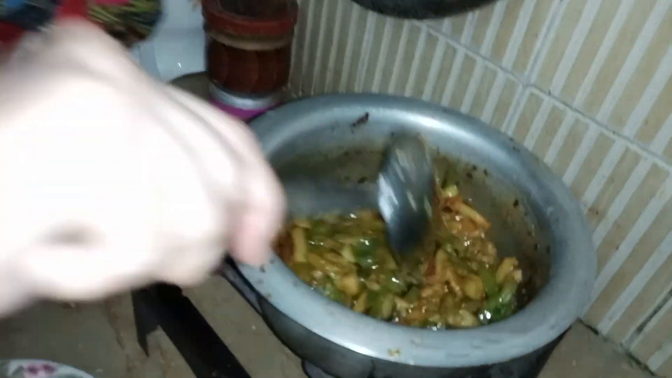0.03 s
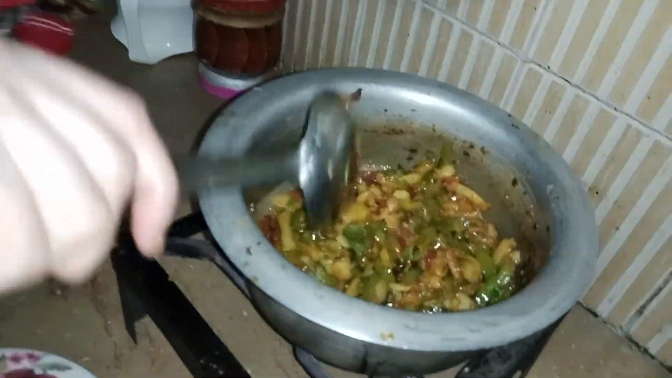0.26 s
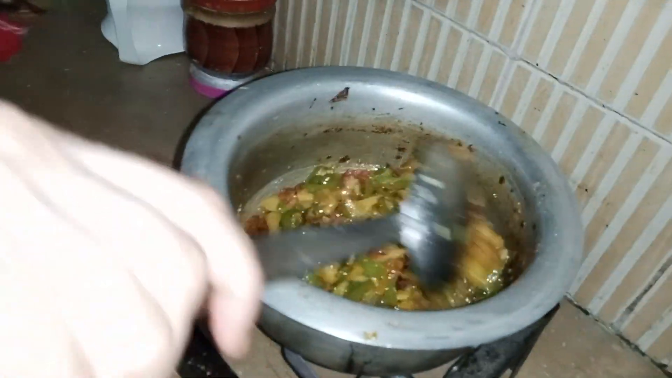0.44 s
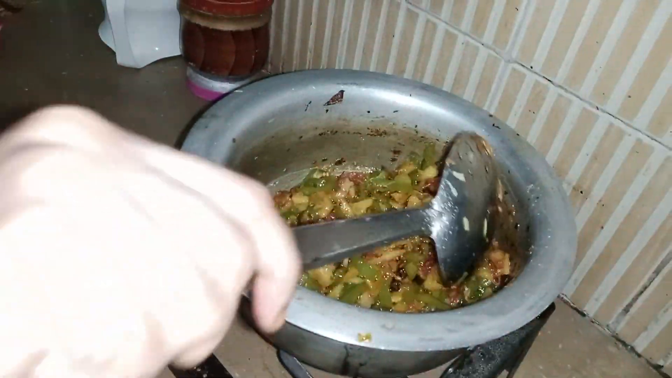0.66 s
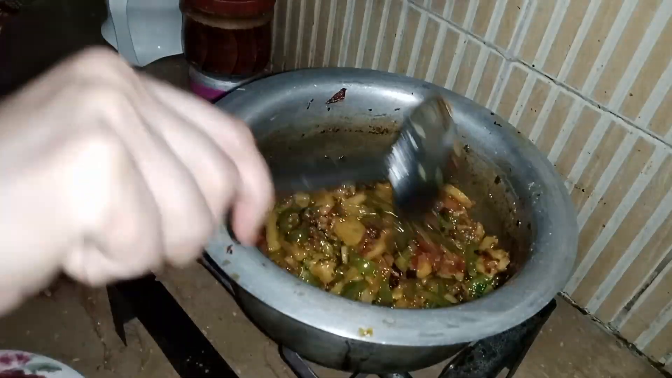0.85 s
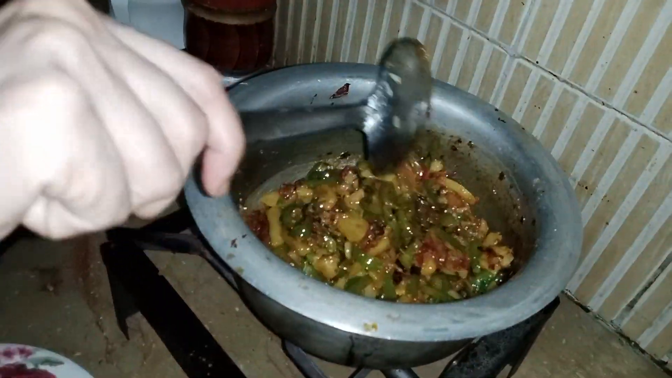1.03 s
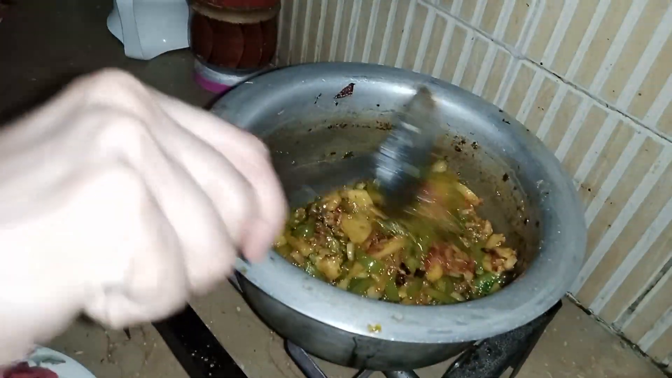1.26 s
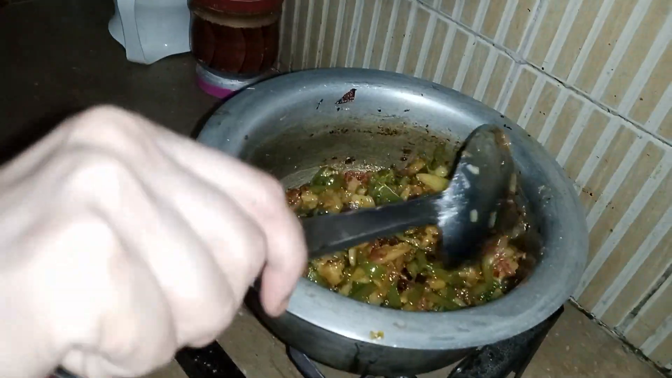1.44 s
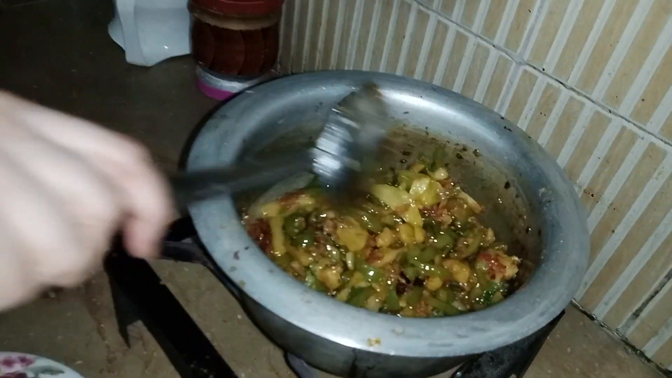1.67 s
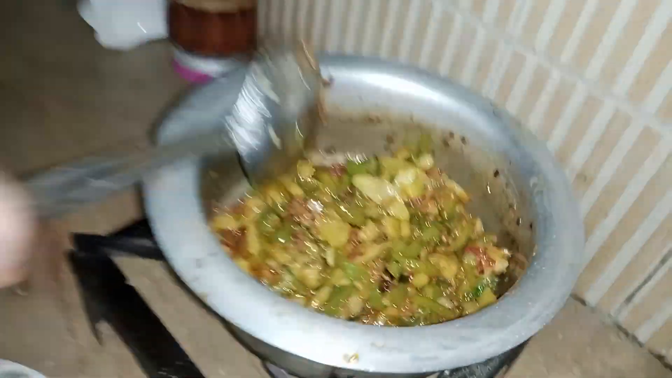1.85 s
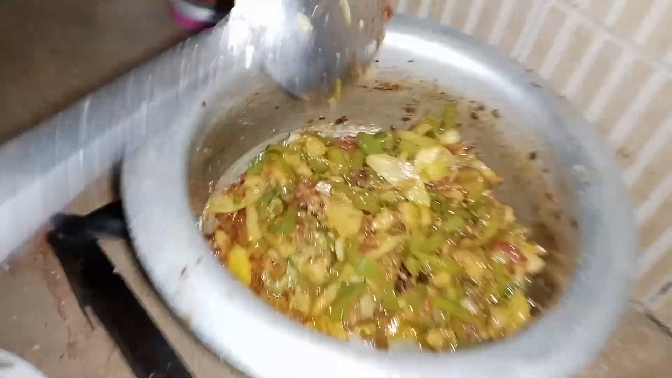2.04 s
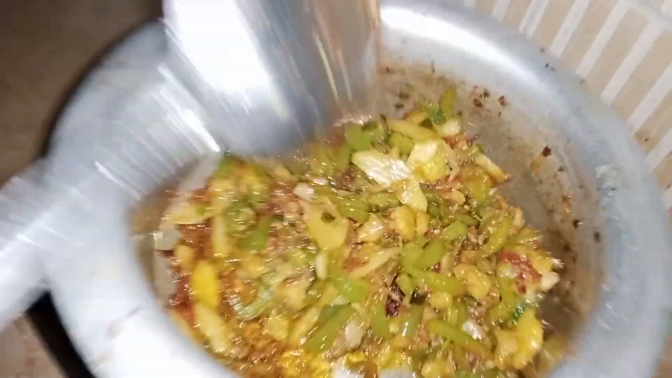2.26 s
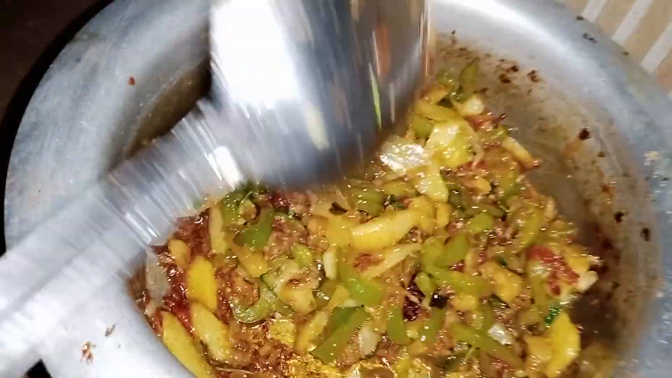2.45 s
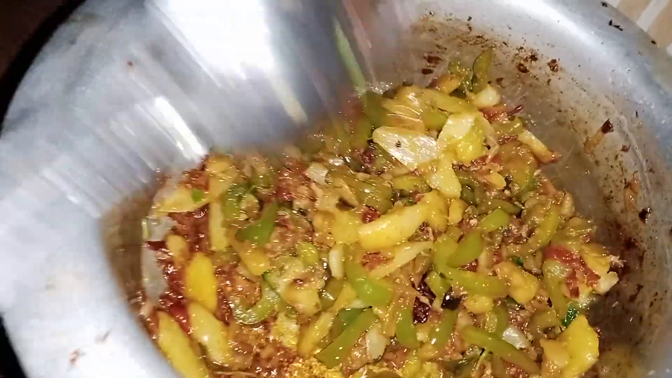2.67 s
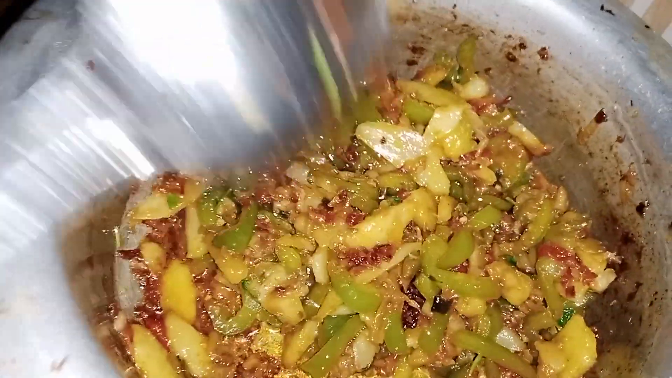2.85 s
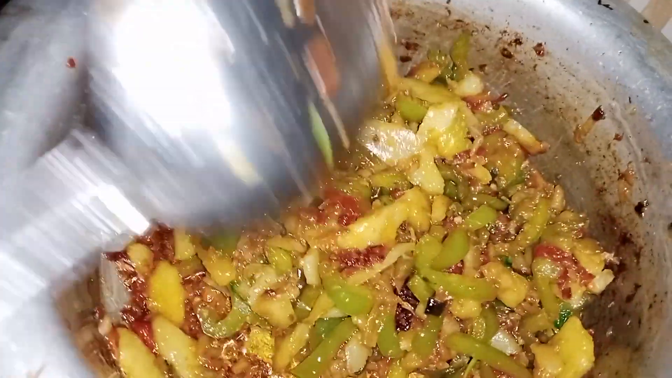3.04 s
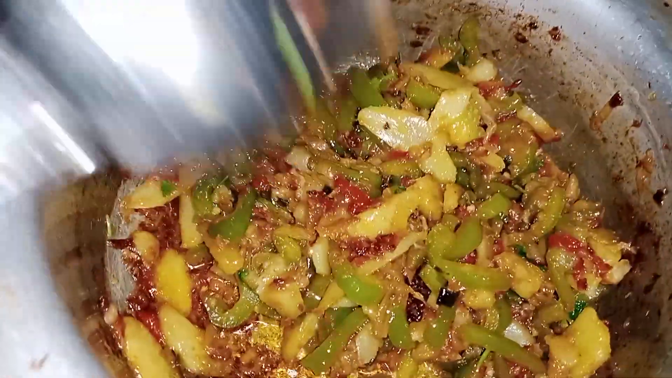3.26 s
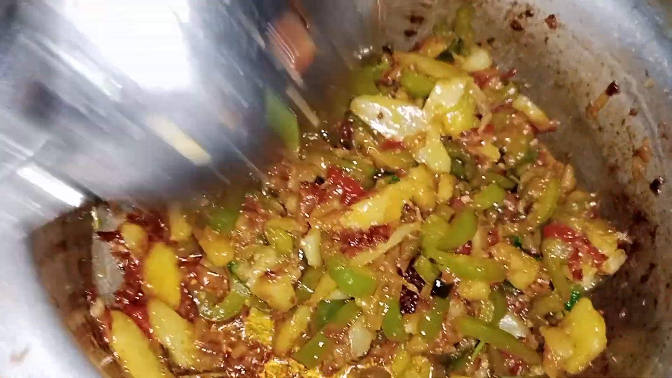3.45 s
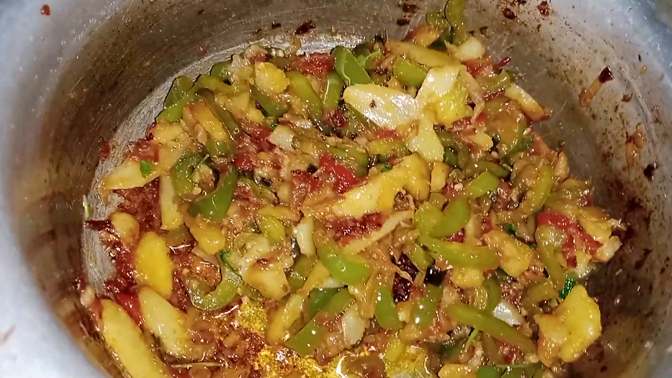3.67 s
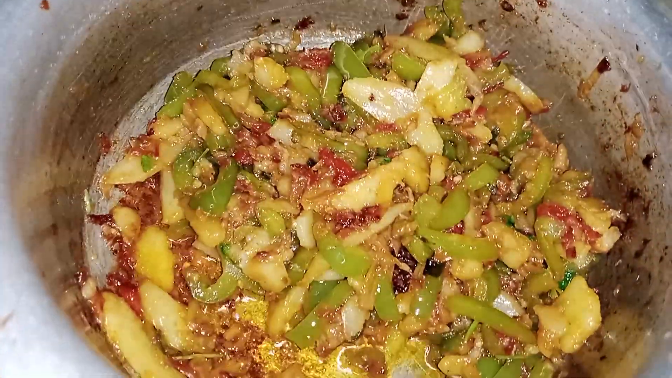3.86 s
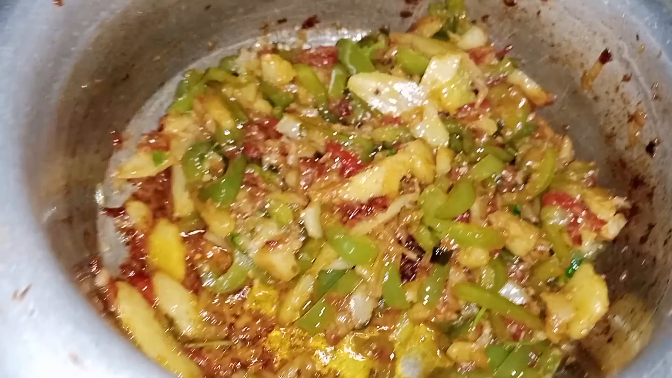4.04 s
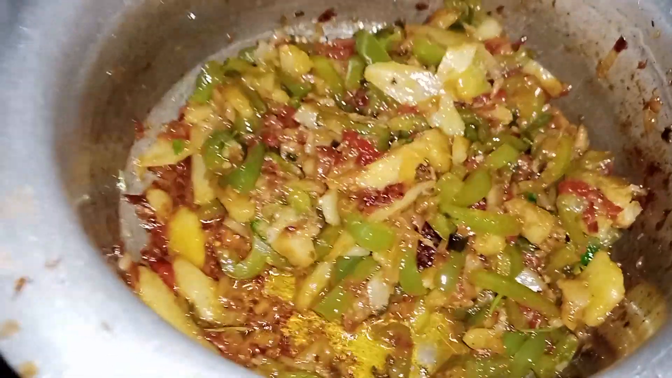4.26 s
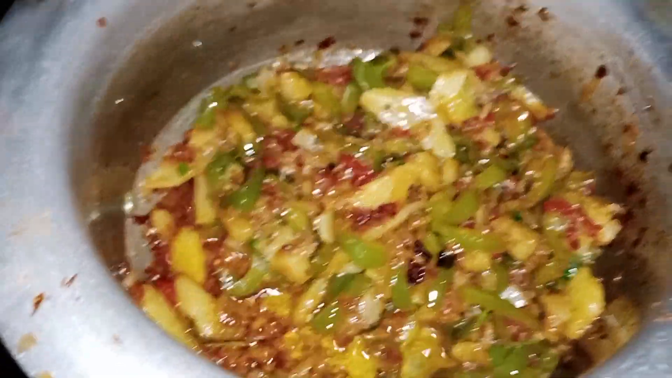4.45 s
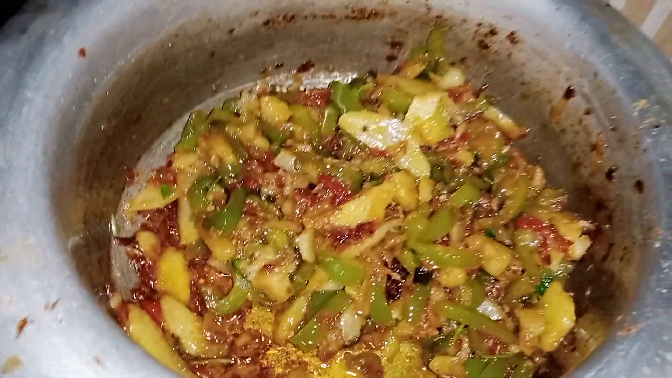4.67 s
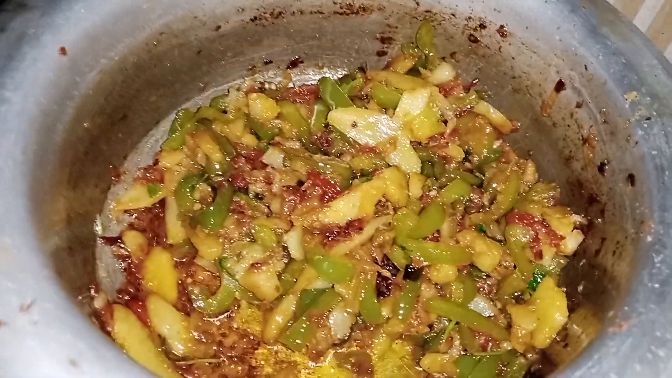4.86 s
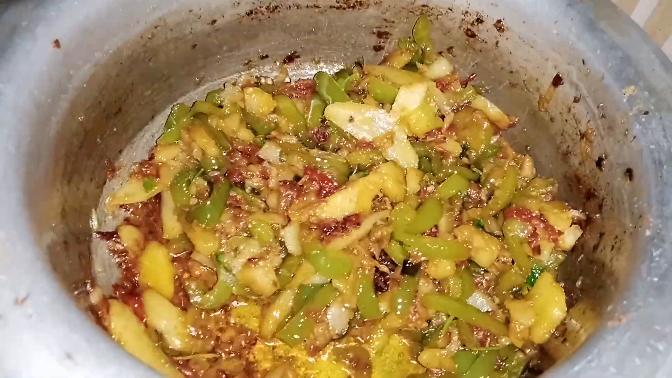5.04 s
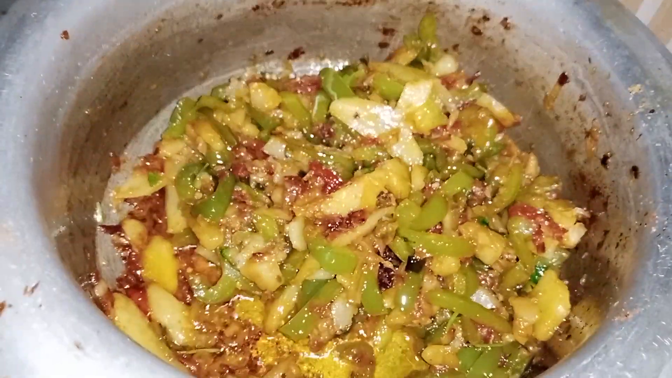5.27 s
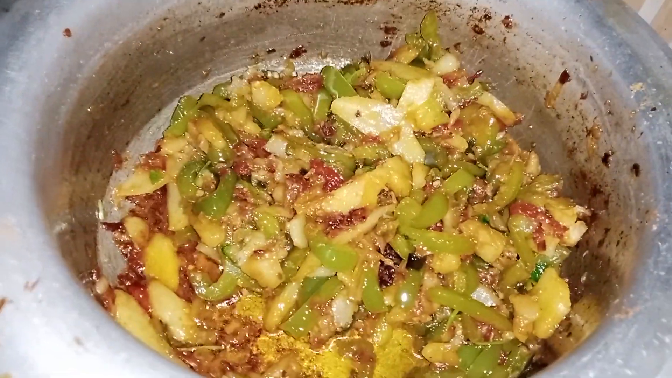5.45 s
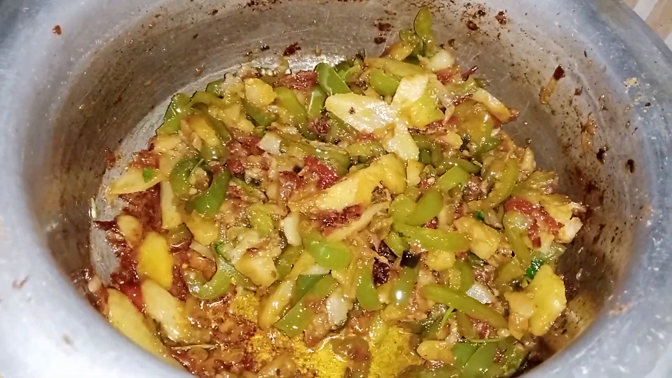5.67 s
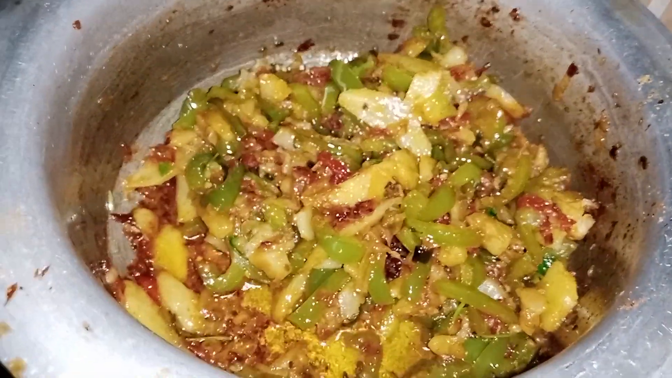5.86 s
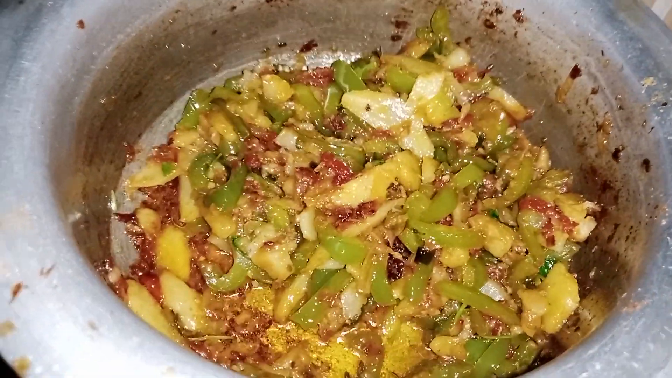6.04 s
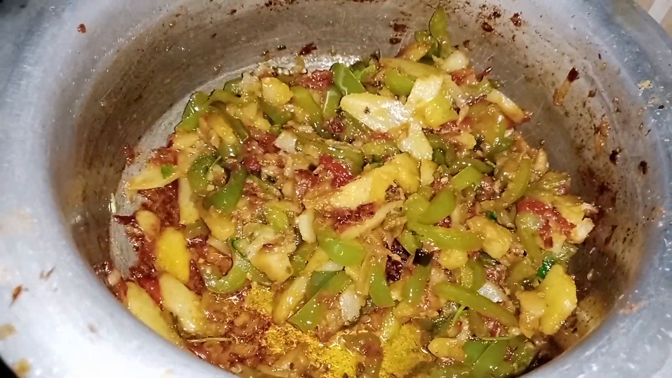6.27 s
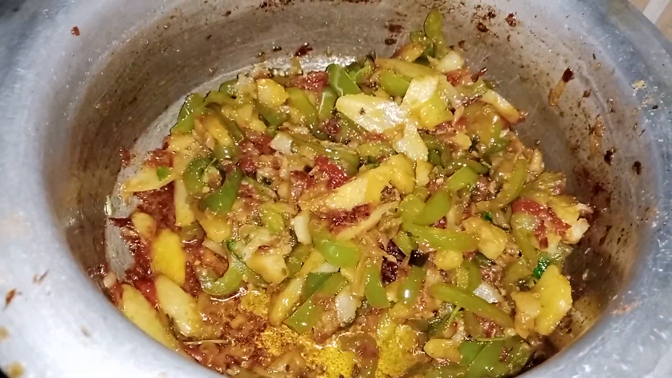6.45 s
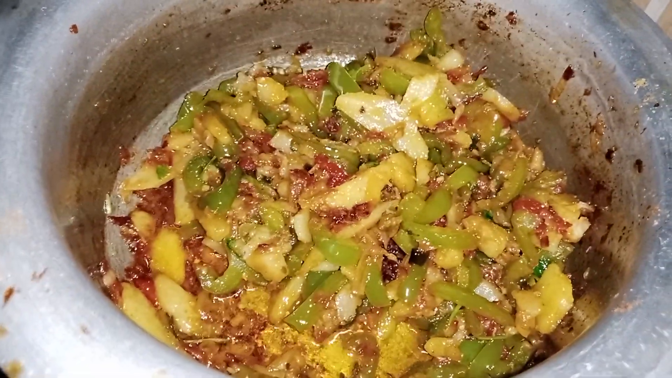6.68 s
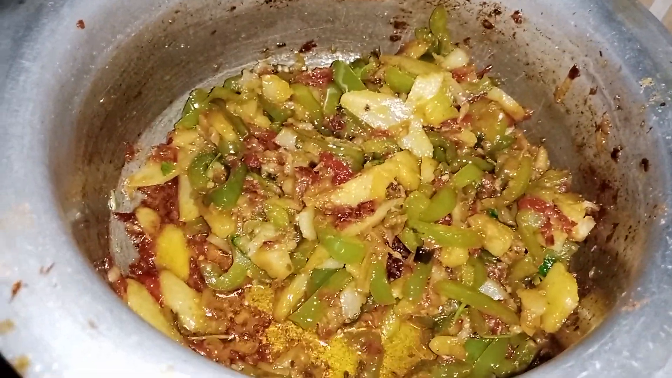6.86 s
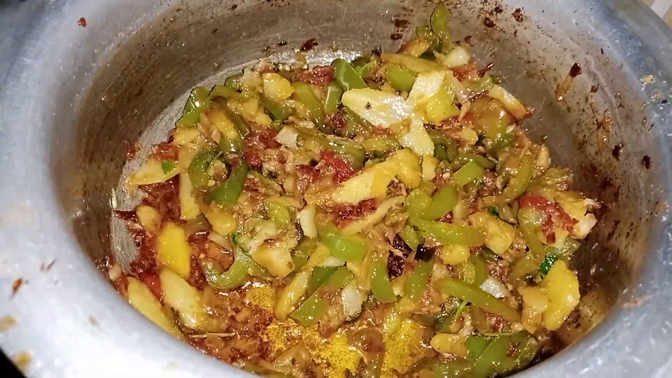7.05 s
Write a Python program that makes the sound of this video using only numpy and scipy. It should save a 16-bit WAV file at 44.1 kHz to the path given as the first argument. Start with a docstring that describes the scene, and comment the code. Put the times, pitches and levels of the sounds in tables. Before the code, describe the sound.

A quiet, fine-grained sizzle of vegetables in oil runs throughout, with bright little spits and a faint gas burner rush, heard close up on a phone in a reverberant tiled kitchen. From 0 to about 1 second a ladle makes soft, wet, hollow strokes through the food; at 1.2 a muffled double knock sounds inside the pot, and another faint stroke follows from 1.75. Between 2.25 and 3.5 seconds the ladle raps the rim seven times, about five per second: loud, hard metallic clacks with short ringing and a quick rattle as the pot drops back. The sizzle ducks under them, then swells back as the echo fades by about 4. A sharp spit comes at 4.3, then a dull, thudding clatter on the counter at 4.4-4.6 with low handling bumps. Gentle frying and a wavering, faint hollow note continue, with a tiny soft rustle at 6.3, until 7.

```python
"""Vegetables sizzle in a pot on a gas burner: bands of resonant bubble clicks, hiss and single spits of fat.
A ladle strokes the food (noise through the pot's air modes) and knocks softly inside the pot.
Then it raps the rim seven times: noise clacks and decaying modes, with a rattle as the pot drops back.
A tiled kitchen reverberates; the phone's limiter ducks on the raps and lets the sound swell back.
Last the ladle clatters down on the counter, and a soft rustle of shaped noise swells and dies away."""
import sys
import numpy as np
from scipy import signal
from scipy.fft import rfft, irfft, next_fast_len
from scipy.io import wavfile
from scipy.ndimage import uniform_filter1d, minimum_filter1d

SR = 44100
rng = np.random.default_rng(int(sys.argv[2]) if len(sys.argv) > 2 else 0)


def store_pcm(level_fs):
    """Save levels as 16-bit WAV."""
    pcm = np.round(np.clip(level_fs, -1, 1) * 32767).astype(np.int16)
    wavfile.write(sys.argv[1], SR, np.atleast_2d(pcm).T)


N = 313551
TIME = np.arange(N) / SR  # seconds

# Raps of the ladle on the rim. Each row: start in seconds, level in dB, pitch of the ladle's ring in Hz,
# ring in dB, body in dB, pitch of the pot's ring in Hz, time until the pot drops back in seconds,
# level of its rattle in dB.
RAPS = [(2.2583, -2, 5800, 1, 0, 1530, .038, -13), (2.48, -3, 4400, 4.5, -1.5, 2500, .043, -10),
        (2.6772, -9.5, 4100, 1, 6.5, 2400, 0.03, -8.5), (2.8823, -4.5, 6500, -0.5, 6.5, 2480, 0.044, -9),
        (3.0906, -2.5, 7200, 2, 3, 2030, .046, -10.5), (3.288, -3, 7500, 3, 2.5, 2000, .047, -9.5),
        (3.4985, -1, 7400, -3.5, 0, 1910, 0.046, -13)]
# Vibration modes of the pot. Each row: frequency in Hz, level in dB, T60 in seconds.
POT = [(450, -3, 0.42), (542, -4, 0.5), (600, -1, 0.6), (682, -5, 0.5), (719, -2, 0.72), (762, -4, 0.5),
       (1343, -4, 0.5), (1553, -1, 0.55), (1797, -9, 0.6), (2039, -1, 0.76), (2227, 2, 0.4),
       (2378, 0, 0.65), (2636, -1, 0.44), (2745, -5, 0.47), (3448, -1, 0.42), (3585, -7, 0.55),
       (3920, -1, 0.41), (4111, -1, 0.54), (4370, -5, 0.5), (4620, -3, 0.5), (4802, -4, 0.5),
       (5410, -1, 0.5), (5655, 4, 0.5), (6019, -3, 0.5), (6442, -3, 0.5), (6714, -4, 0.5), (6961, -4, 0.5),
       (7280, -6, 0.5), (7647, -7, 0.5), (9040, -6, 0.5)]


def rapping():
    """Impact and modal decay: a noisy contact excites ladle, pot and stove; the pot then rattles."""
    # Modes of the stand and stove. Each row: frequency in Hz, level in dB, T60 in seconds.
    stove_modes = [(87.1, 1.5, 0.41), (100, -6, 0.5), (125.5, -19.5, .3), (322, -6, 0.2)]
    # Colour of metal on metal. Each row: frequency in Hz, gain in dB.
    clack_colour = [(60, -27), (130, -4.5), (260, -8.5), (460, 1.5), (700, 3.5), (1000, -8.5), (1350, -4.5),
                    (2700, -6), (3150, -7), (4100, -1.5), (7000, -3.5), (9000, -2.5), (13300, -17.5),
                    (15300, -14)]
    # The ladle's own short ring. Each row: frequency in Hz, level in dB, T60 in seconds.
    ladle_modes = [(3950, -2, .08), (4280, -3, .07), (4620, 0, .08), (4830, -1, .08), (5440, -5, .08),
                   (6130, -4, .08), (6480, -3, .08), (6730, 0, .1), (6970, 1, .1), (7130, 0, .1),
                   (7290, -3, .1), (7630, -4, .09), (8300, -7, .07), (8520, -6, .07), (9030, -2, .1),
                   (10700, -11, .05)]
    rattle_colour = [(200, -2), (550, 2.5), (1500, 4.5), (2700, 7.5), (5000, -6.0), (9000, -11.5)]

    clacks, ringing = np.zeros(N), np.zeros(N)
    stove = rings(stove_modes)
    bite = 1 - np.exp(-TIME[:SR] / .0008)  # the contact force takes a moment to build
    for s, db, ring_hz, ring_db, body_db, pot_hz, *_ in RAPS:
        spot = [(900, body_db), (ring_hz * 0.66, -1), (ring_hz, ring_db + 7.0), (ring_hz * 1.37, -body_db)]
        contact = bite * (burst(0.04) + amp(0.5) * burst(0.013))
        clack = colour(colour(contact, spot), clack_colour)
        ladle = strike(favour(ladle_modes, ring_hz, ring_db=6), scatter_db=1)
        pot = strike(favour(POT, pot_hz, ring_db=5), scatter_db=1)
        add(clacks, s, amp(db) * (clack + amp(ring_db - 22) * ladle))
        add(ringing, s, amp(db - 32) * pot)
        add(ringing, s, amp(db - 37.5) * strike(stove, scatter_db=0.5))

    pot_hz = np.array(POT)[:, :1]
    duller = rings(POT) / np.hypot(1, pot_hz / 4500)  # softer landings excite less treble
    for s, db in rocking(count=3):
        clack = colour(colour(bite * burst(t60=0.046), rattle_colour), clack_colour)
        pot = strike(duller, scatter_db=-0.5)
        add(clacks, s, amp(db) * clack)
        add(ringing, s, amp(db - 36.0) * pot + amp(db - 28.0) * strike(stove, scatter_db=0))
    return clacks + ringing + amp(-5.5) * kitchen(clacks, build_s=0.0056)


def favour(modes, ring_hz, ring_db):
    """Selective excitation: the spot that lands drives the modes around one pitch hardest."""
    hz = np.array(modes)[:, :1]
    octaves = np.log2(hz / ring_hz)
    return amp(ring_db * np.exp(-(octaves / 0.47) ** 2)) * rings(modes)


def rocking(count):
    """Energy loss in rebound: the pot lands in ever shorter, softer hops; rows of (s, dB)."""
    hop_share, hop_loss_db = .55, 1.72  # length relative to the hop before; drop in level per hop
    hops = np.arange(count)
    landings = np.cumsum(hop_share ** hops)
    return [(s + drop_s * landings[k], db - hop_loss_db * k) for s, *_, drop_s, db in RAPS for k in hops]


def knocking():
    """Damped impact: cushioned by food, the ladle wakes mainly the pot's lower modes."""
    # Soft knocks inside the pot. Each row: start in seconds, level in dB.
    knocks = [(1.2217, 0.5), (1.228, -2)]
    # How a blow on the inner wall shares its force. Each row: mode frequency in Hz, gain in dB.
    wall = [(450, -26), (600, -10.5), (720, 0.5), (780, -25), (1340, -20), (1550, -2.5), (1800, 9),
            (2040, 1.5), (2400, -14), (2750, -8), (3400, -4), (9000, -26)]
    clunk_colour = [(300, -46), (660, 7), (950, -44), (1700, -10), (2200, -20), (2700, 7),
                    (3100, -17), (9000, -21)]
    out = np.zeros(N)
    share = amp(np.interp(np.array(POT)[:, :1], *np.transpose(wall)))
    for s, db in knocks:
        clunk = colour(burst(0.076), clunk_colour)
        pot = strike(share * rings(POT), scatter_db=-4)
        add(out, s, amp(db - 56.0) * pot + amp(db - 30.0) * clunk)
    return out


def setting_down():
    """Heavily damped impact: each contact of ladle and counter is a dull clatter with a low thud."""
    # Contacts with the counter. Each row: start in seconds, relative level in dB, T60 in seconds,
    # relative thud in dB.
    contacts = [(4.415, -40, 0.16, -1), (4.445, -41.5, 0.12, 4.5), (4.495, -49, 0.22, -5),
                (4.552, -47.5, 0.11, -2.5), (4.563, -43.5, 0.14, -12), (4.574, -43.5, 0.1, -4)]
    # Colour of the clatter. Each row: frequency in Hz, gain in dB.
    counter_colour = [(100, -28), (300, -8), (550, -10.5), (800, -5.5), (1300, -1.5), (1900, -2),
                      (2900, -2.5), (4500, -5), (8000, -6.5), (15000, -27)]
    slab = rings([(84.0, -13, 0.3), (109.6, 5.0, 0.16), (137, -1, 0.14), (208, -5.0, 0.28),
                  (271.6, -2.0, 0.23), (551, -3.0, 0.13), (1486, -1.5, 0.063), (2790, 2.0, 0.081)])
    out = np.zeros(N)
    for s, db, t60, thud_db in contacts:
        clatter = colour(burst(t60), counter_colour)
        thud = amp(thud_db - 16.0) * strike(slab, scatter_db=0.0)
        add(out, s, amp(db + 8.5) * (clatter + thud))
    return out


def spitting():
    """Explosive boiling: a water drop bursts in the fat as a snap around one pitch and a brief fizz."""
    # The loudest spits. Each row: start in seconds, level before colouring in dB, pitch in Hz, fizz in dB.
    loud_spits = [(0.0102, -30, 6250, -6), (0.5732, -29.5, 6160, -8), (0.849, -29, 6260, -4),
                  (1.3124, -36, 5400, -7), (1.8562, -32, 4330, -5), (4.3268, -24.5, 4710, -7),
                  (5.6042, -34, 6730, -6.5), (5.7152, -34, 6100, -3), (6.2312, -32, 5690, -7),
                  (6.6538, -28, 6140, -7.5), (6.9376, -31.5, 2940, -5)]
    spit_colour = [(400, -22), (1500, -10), (3000, 1), (9000, 0), (13000, -6), (15500, -1)]
    out = np.zeros(N)
    for s, db, hz, fizz_db in list(loud_spits) + faint_spits(count=14, fizz_db=-3.5):
        ping = fade(.0012) * np.cos(2 * np.pi * hz * TIME[:SR])
        snap = ping + amp(-9) * burst(.004)
        fizz = amp(fizz_db) * colour(burst(.035), [(hz / 2.5, -16), (hz, 0), (hz * 2.5, -16)])
        add(out, s, amp(db) * colour(snap + fizz, spit_colour))
    return out


def faint_spits(count, fizz_db):
    """Random scatter of small bursts in time, level and pitch: rows like those of the loud spits."""
    mean_db = -44.5
    low, high = 2600, 7000  # Hz
    return [(when * TIME[-1], mean_db + 6 * (size - .5), low * (high / low) ** pitch, fizz_db)
            for when, size, pitch in rng.random((count, 3))]


def frying(bubbles_per_s, spread, hiss_db, flicker_db):
    """Bubble resonance: random steam bursts ring in eight bands, a few louder than the rest, over hiss."""
    # Colour of the sizzle. Each row: frequency in Hz, gain in dB.
    fry_colour = [(700, -25), (1800, -17.5), (2250, -13.5), (2600, -5), (3150, -7.5), (3700, -2),
                  (4800, -2.5), (6300, 1.5), (7800, -5.5), (9400, -3), (11000, -12.5), (13300, -27.5),
                  (14200, -17), (15200, -13.5)]
    # Flares where wet food meets hot metal. Each row: start in seconds, length in seconds, level in dB.
    flares = [(0, 0.079, -51.5), (.1, 0.3, -56.5), (.85, .4, -59.5), (1.77, 0.6, -56), (4.05, .5, -57.5),
              (4.55, 0.13, -53.5), (5.62, 0.27, -62), (6.13, 0.23, -55)]
    out = 0
    for hz in np.linspace(1500, 15500, 8):
        sizes = amp(spread * np.minimum(rng.exponential(size=N), 4))
        bursts = rng.random(N) < bubbles_per_s / SR  # the rate holds for each band
        bubbles = bursts * sizes * rng.choice([-1, 1], N)
        out = out + resonate(bubbles, hz, 2000) * amp(flicker_db * walk(30))
    hiss = rng.standard_normal(N) * amp(hiss_db + 0.35 * walk(7.1))
    settling = amp(-53.5 - 0.34 * TIME)  # sinks by 0.34 dB per second as the food settles
    boiling = np.hypot(settling, swells(flares, attack_s=0.01, release_s=0.053))
    return unit(colour(unit(out) + hiss, fry_colour)) * boiling


def stirring(uneven_db):
    """Cavity resonance: the uneven noise of sliding wet food stirs the pot's air modes in turn."""
    # Air modes inside the pot. Each row: frequency in Hz, width of one filter pass in Hz, level in dB.
    cavity = [(596, 65, -11), (763, 53, -3), (1210, 58, -6), (1326, 110, 1.5), (1553, 77, -7.5),
              (2036, 85, 2), (2515, 240, 0)]
    # Strokes of the ladle through the food. Each row: start in seconds, length in seconds, level in dB.
    strokes = [(0, 0.12, -67), (.27, 0.17, -61), (.66, 0.27, -67.5), (1.75, 0.65, -69)]
    air = 0
    for hz, width, db in cavity:
        once = resonate(rng.standard_normal(N), hz, width)
        air = air + amp(db + uneven_db * walk(12)) * resonate(once, hz, width)
    return unit(air) * swells(strokes, attack_s=0.017, release_s=0.16)


def rustling():
    """Friction noise: skin brushes lightly over something soft, once."""
    peak_s, rise_s, fall_s = 6.3, 0.018, .036
    soft = [(300, -17), (600, -11), (900, -1.5), (1700, -7.0), (2700, 3.5), (5000, -6.0),
            (10000, -21), (14000, -33)]
    grains = rng.standard_normal(N) * amp(2 * walk(110))
    touch = np.exp(-np.maximum((peak_s - TIME) / rise_s, (TIME - peak_s) / fall_s))
    return unit(colour(grains, soft)) * amp(-51.5) * touch


def burner():
    """Turbulent jet noise: the gas rushes faintly, and a wavering hollow note grows over the pot."""
    # Colour of the gas jet. Each row: frequency in Hz, gain in dB.
    gas_colour = [(100, -8.5), (190, 3), (250, -7), (295, 5.5), (350, -4.5), (470, -7), (550, -4),
                  (700, -8.5), (1200, -12), (1750, -21.5), (2100, -15), (4000, -22.5)]
    # Nearness of the phone to the pot's mouth. Each row: time in seconds, gain in dB.
    near = [(1.8, -17.5), (4, -1)]
    hollow_colour = [(900, -53.0), (1280, -13.5), (1390, -1.0), (1500, -15.5), (1900, -32.5)]
    jet = unit(colour(rng.standard_normal(N), gas_colour)) * amp(-70.5 + 0.78 * walk(30))
    hollow = unit(colour(rng.standard_normal(N), hollow_colour))
    waver = amp(3.5 * walk(8))
    return jet + hollow * waver * curve(near) * amp(-72.0)


def rumbling():
    """Low-frequency noise: the flame flutters, and the hand that holds the phone adds soft bumps."""
    # Colour of the rumble. Each row: frequency in Hz, gain in dB.
    flame_colour = [(30, -30), (60, -30), (82, 5.5), (100, -7), (125, -5.5), (180, -15.5), (300, -22)]
    # Bumps as the phone is moved in the hand. Each row: start in seconds, length in seconds, level in dB.
    bump_rows = [(.27, 0.052, -57.5), (.52, 0.34, -65), (1.25, 0.13, -59), (1.5, .65, -70.5),
                 (3.93, 0.29, -57.5), (4.42, 0.17, -54), (5.06, .08, -59), (5.35, 0.089, -66),
                 (6.55, 0.57, -64.5)]
    flame = amp(-71.5 + 3 * walk(13))
    bumps = swells(bump_rows, attack_s=0.013, release_s=0.077)
    rumble = unit(colour(rng.standard_normal(N), flame_colour + [(1500, -74.5)]))
    return rumble * np.hypot(flame, bumps)


def kitchen(x, build_s):
    """Reverberant decay: the tiled room's echoes build up quickly and the treble dies first."""
    # Decay of the room. Each row: frequency in Hz, T60 in seconds.
    room_t60 = [(100, 0.94), (600, 0.54), (2500, 0.51), (7000, 0.44), (15000, 0.42)]
    hz, t60 = np.transpose(room_t60)
    bins = np.fft.rfftfreq(SR, 1 / SR)
    noise = rfft(rng.standard_normal(SR))
    tail = 0
    edges = np.geomspace(40, SR / 2, 10)
    for lo, hi in zip(edges, edges[1:]):
        band = irfft(noise * (bins >= lo) * (bins < hi), SR)
        tail = tail + band * fade(np.interp(np.log(lo * hi) / 2, np.log(hz), t60))
    tail *= 1 - np.exp(-TIME[:SR] / build_s)
    return signal.fftconvolve(x, tail / np.sqrt(np.sum(tail ** 2)))[:N]


def amp(db):
    """Decibel law: amplitude ratio of a level in dB."""
    return 10 ** (np.asarray(db) / 20)


def unit(x):
    """Normalisation to an RMS value of 1."""
    return x / np.sqrt(np.mean(x ** 2))


def curve(rows):
    """Gain interpolated over time from rows of (s, dB)."""
    return amp(np.interp(TIME, *np.transpose(rows)))


def swells(rows, attack_s, release_s):
    """Power summation of envelopes (s, length s, dB): each rises, holds to its length and dies away."""
    power = 0
    for s, length, db in rows:
        rise = np.clip((TIME - s) / attack_s, 0, 1)
        fall = np.exp(-np.maximum(TIME - s - length, 0) / release_s)
        power = power + (amp(db) * rise * fall) ** 2
    return np.sqrt(power)


def fade(t60):
    """Exponential decay, one second long, that falls 60 dB in t60 seconds."""
    return np.exp(-np.log(1000) * TIME[:SR] / t60)


def add(track, s, x):
    """Superposition: mix x into the track at time s."""
    i = int(s * SR)
    track[i:i + len(x)] += x[:N - i]


def colour(x, points):
    """Minimum-phase filtering: a causal response through (Hz, dB) points, by way of the cepstrum."""
    size = next_fast_len(len(x) + SR // 10)
    hz, db = np.transpose(points)
    bins = np.fft.rfftfreq(size, 1 / SR)
    gain = amp(np.interp(np.log(bins + 1), np.log(hz), db))
    cepstrum = irfft(np.log(gain), size)
    cepstrum[1:size // 2] *= 2  # fold the cepstrum onto positive time
    cepstrum[size // 2 + 1:] = 0
    return irfft(rfft(x, size) * np.exp(rfft(cepstrum)), size)[:len(x)]


def resonate(x, hz, width):
    """Two-pole resonance of a given width in Hz, scaled to unit level."""
    return unit(signal.lfilter(*signal.iirpeak(hz, hz / width, fs=SR), x))


def rings(modes):
    """Modal vibration: one decaying sine for each (Hz, dB, T60 s)."""
    return np.array([amp(db) * fade(t60) * np.sin(2 * np.pi * hz * TIME[:SR]) for hz, db, t60 in modes])


def strike(modes, scatter_db):
    """Modal excitation: each blow shares its force among the modes with random signs and levels."""
    signs = rng.choice([-1, 1], len(modes))
    return (signs * amp(scatter_db * rng.standard_normal(len(modes)))) @ modes


def burst(t60):
    """Dense modal overlap: the fast-dying vibration after a contact, as decaying noise."""
    return rng.standard_normal(SR) * fade(t60)


def walk(rate):
    """Interpolated randomness: a wander through `rate` random points per second, spread near 1."""
    return np.interp(TIME * rate, np.arange(1024), rng.standard_normal(1024))


def scene():
    """Superposition of the raps, the small impacts with their reverberation, and the steady bed."""
    small = knocking() + setting_down() + spitting()
    bed = frying(bubbles_per_s=420, spread=5.2, hiss_db=4.5, flicker_db=5.0)
    bed = bed + stirring(uneven_db=7) + rustling() + burner() + rumbling()
    return (rapping() + small + amp(-6.5) * kitchen(small, build_s=0.0039) + bed)[None]


def limiter(x, top_db, release_db_per_s, ahead_s):
    """Look-ahead gain control: the gain dives just before a peak and climbs back at a steady rate."""
    level = np.sqrt(np.abs(uniform_filter1d(x ** 2, SR // 500)) + 1e-12)  # RMS over 2 ms
    over = np.maximum(20 * np.log10(level) - top_db, 0)
    climb = release_db_per_s * TIME
    gain_db = climb - np.maximum.accumulate(over + climb)
    span = max(int(ahead_s * SR), 2)
    early_db = minimum_filter1d(gain_db, 2 * span + 1)
    return x * amp(uniform_filter1d(early_db, span))


def record(dry):
    """Band limiting and compression: the phone thins the deep bass, limits, rounds and cuts the top."""
    thinned = signal.sosfilt(signal.butter(3, 55, "high", fs=SR, output="sos"), dry[0])
    limited = limiter(thinned, top_db=-14.5, release_db_per_s=180.0, ahead_s=0.012)
    ceiling = .5
    rounded = ceiling * np.tanh(limited / ceiling)
    top_cut = signal.ellip(8, .2, 70, 16200, fs=SR, output="sos")  # low-pass at 16200 Hz
    return signal.sosfilt(top_cut, rounded)[None]


dry = scene()
out = record(dry)
store_pcm(out)
```